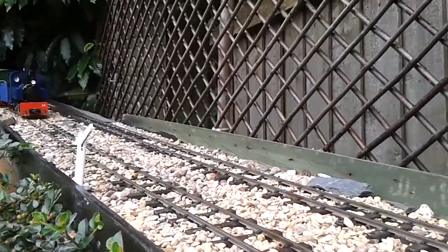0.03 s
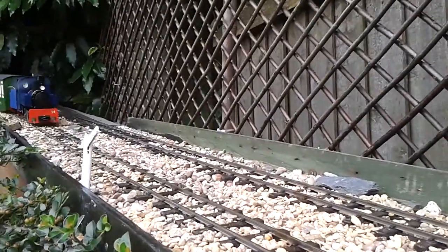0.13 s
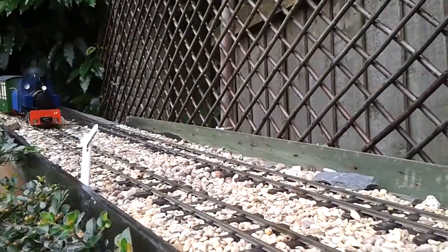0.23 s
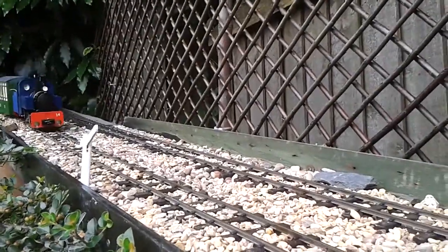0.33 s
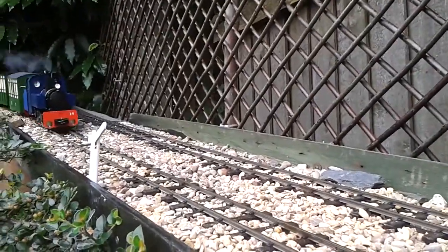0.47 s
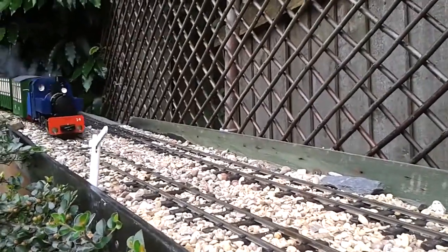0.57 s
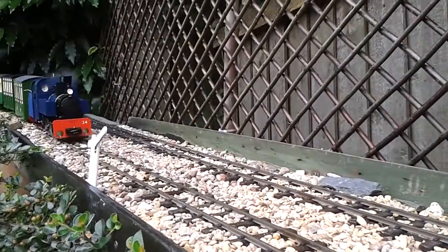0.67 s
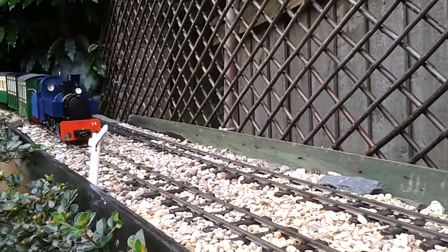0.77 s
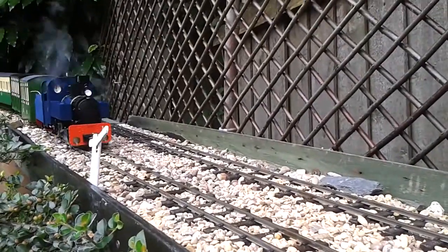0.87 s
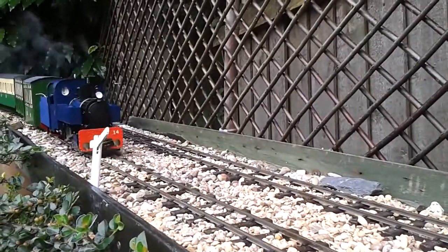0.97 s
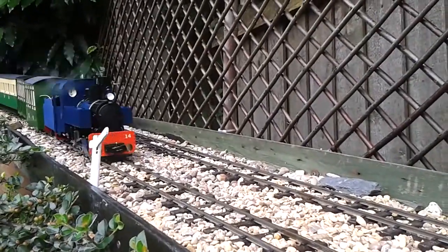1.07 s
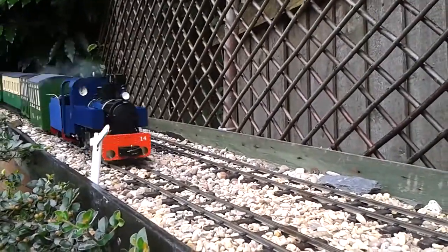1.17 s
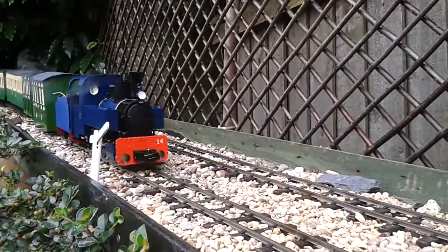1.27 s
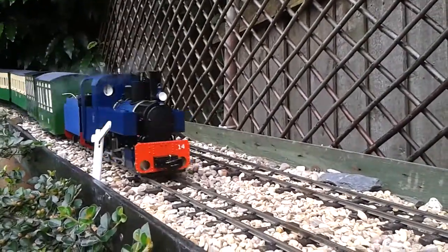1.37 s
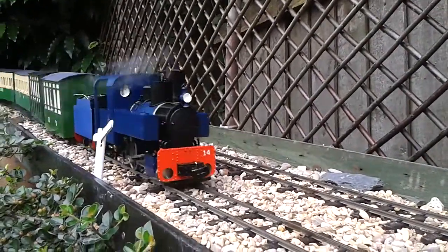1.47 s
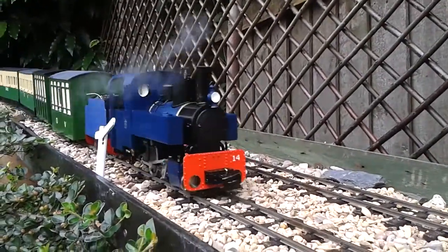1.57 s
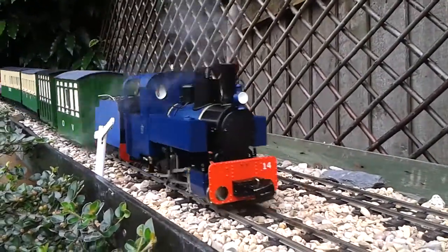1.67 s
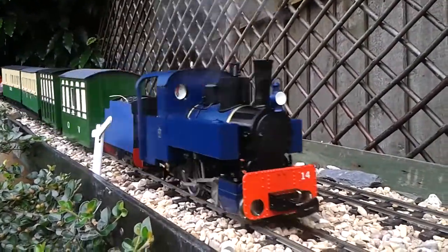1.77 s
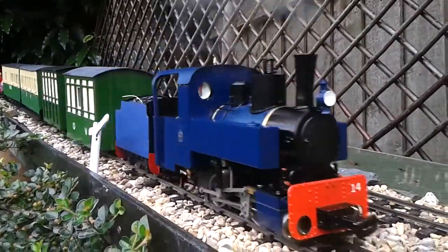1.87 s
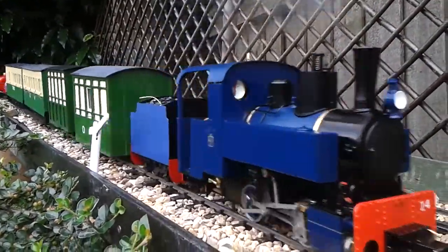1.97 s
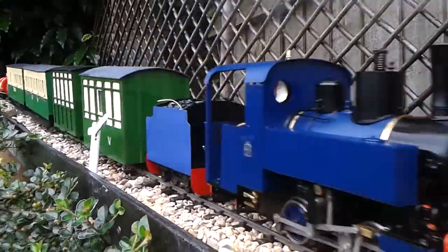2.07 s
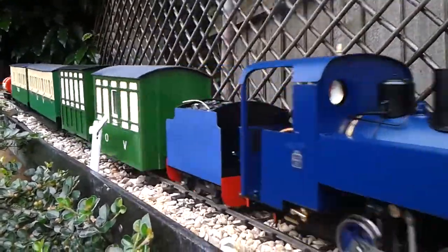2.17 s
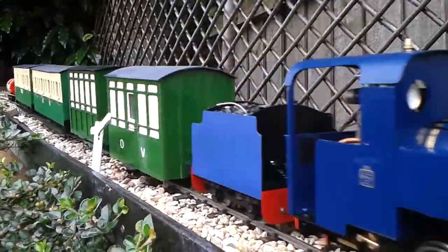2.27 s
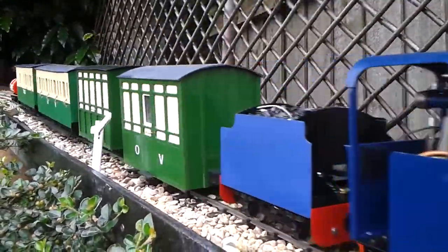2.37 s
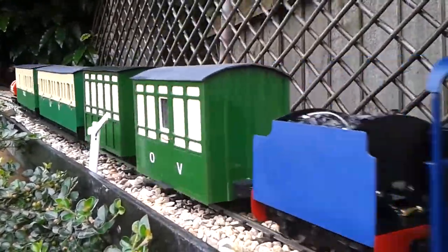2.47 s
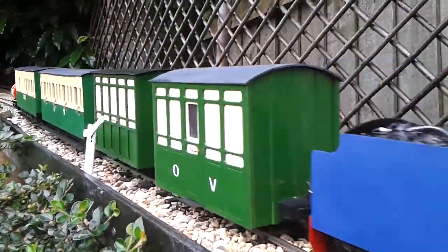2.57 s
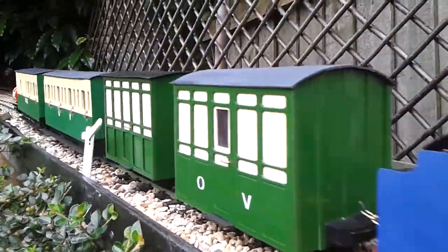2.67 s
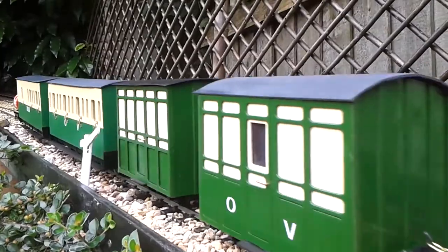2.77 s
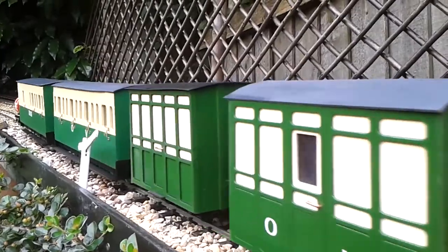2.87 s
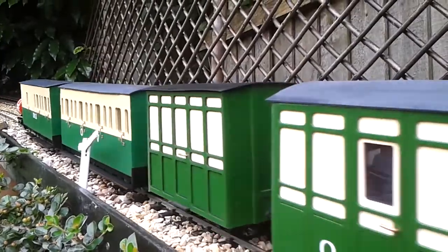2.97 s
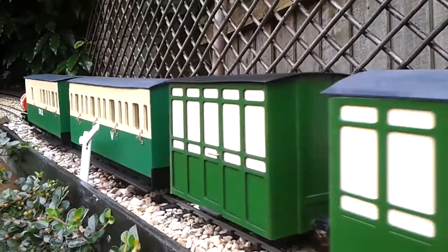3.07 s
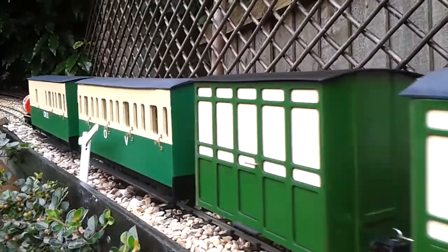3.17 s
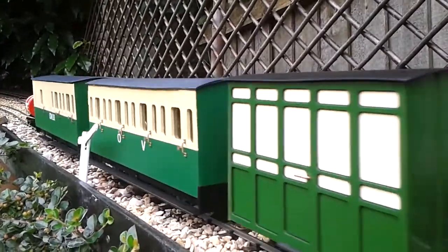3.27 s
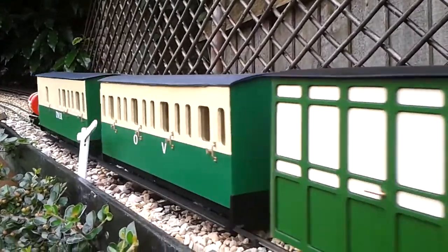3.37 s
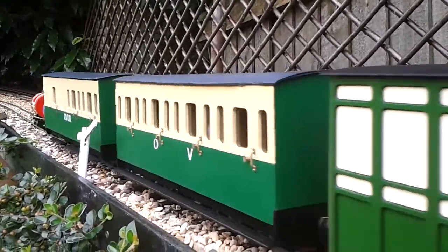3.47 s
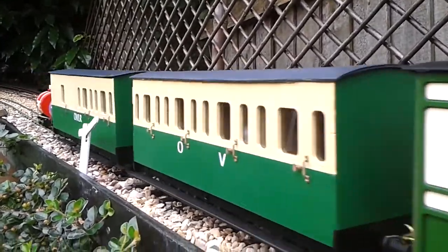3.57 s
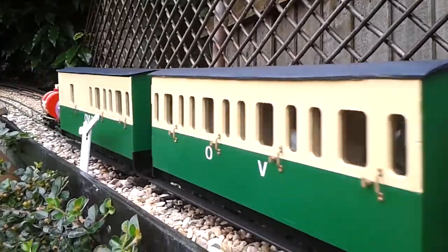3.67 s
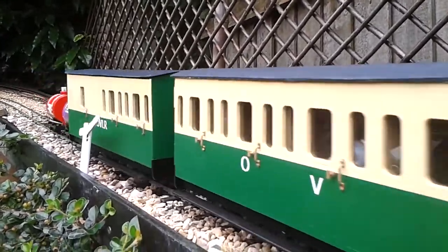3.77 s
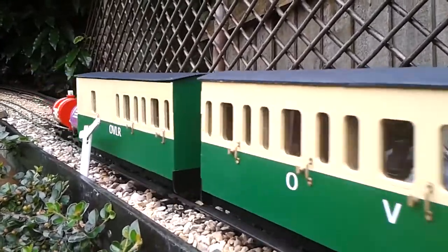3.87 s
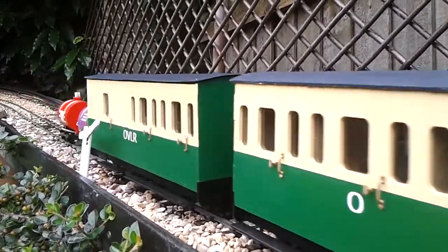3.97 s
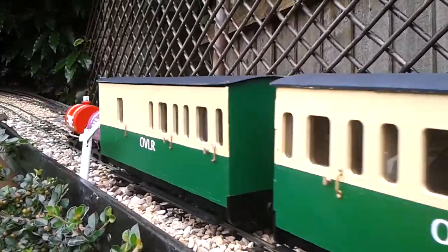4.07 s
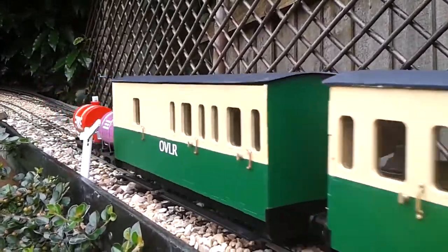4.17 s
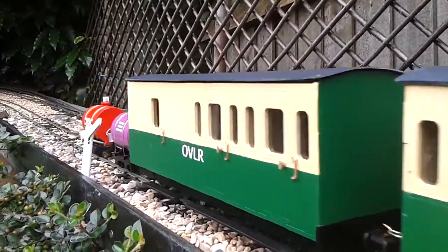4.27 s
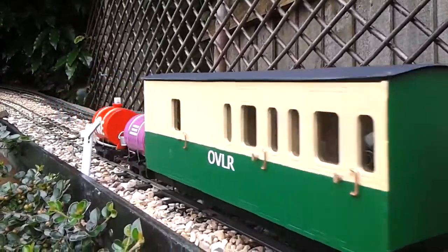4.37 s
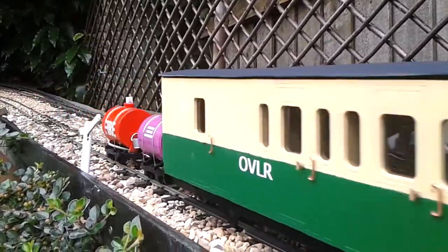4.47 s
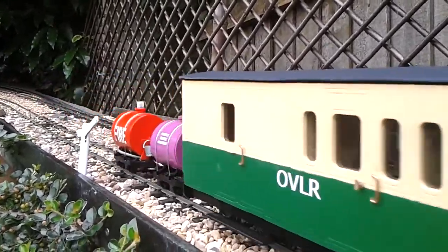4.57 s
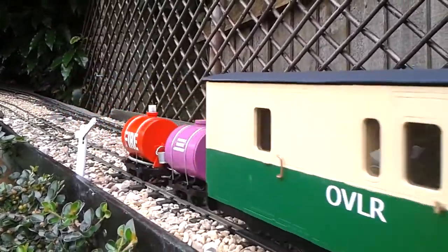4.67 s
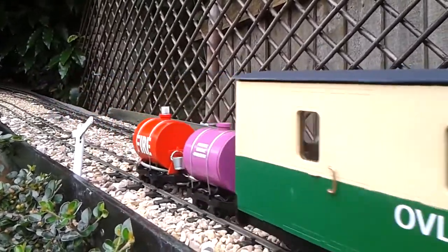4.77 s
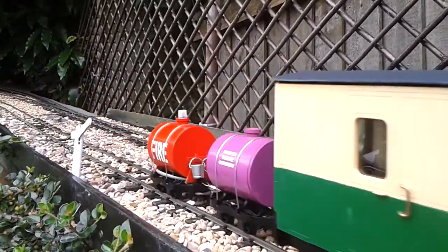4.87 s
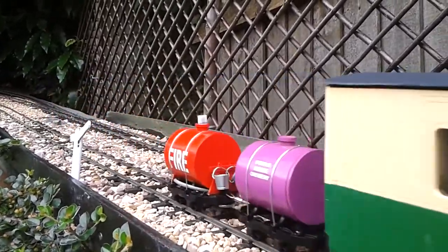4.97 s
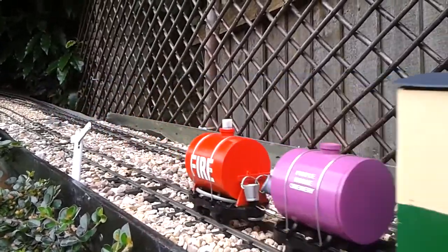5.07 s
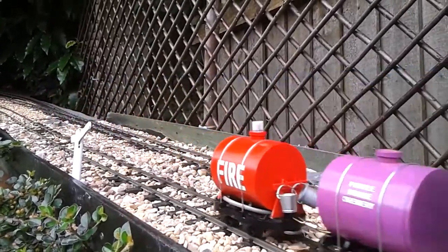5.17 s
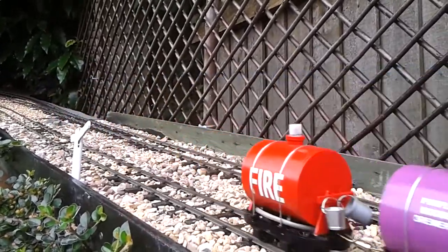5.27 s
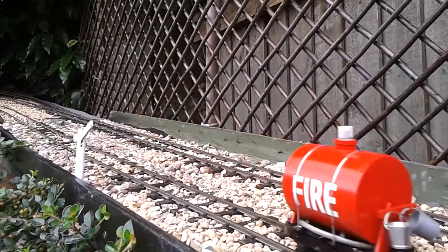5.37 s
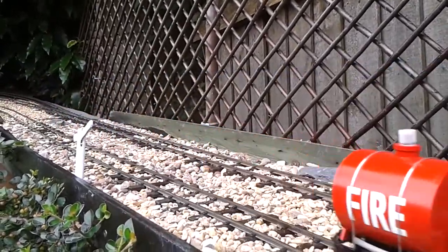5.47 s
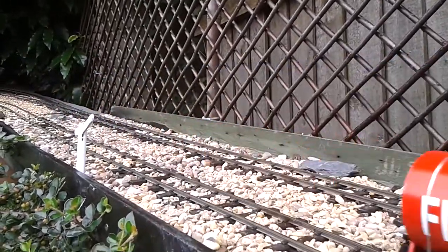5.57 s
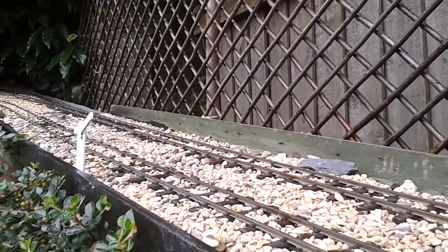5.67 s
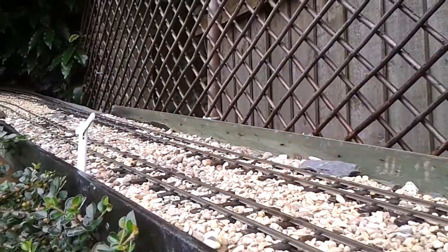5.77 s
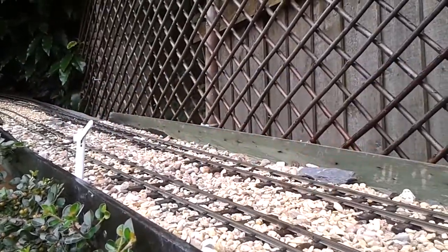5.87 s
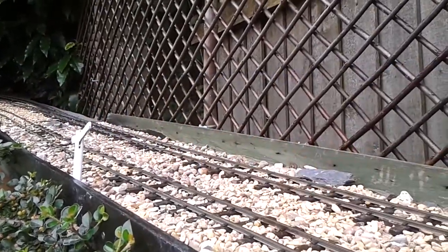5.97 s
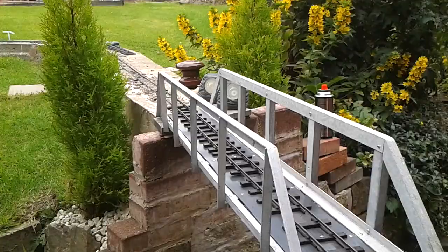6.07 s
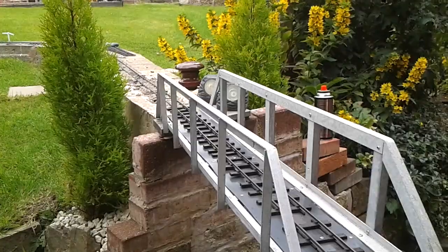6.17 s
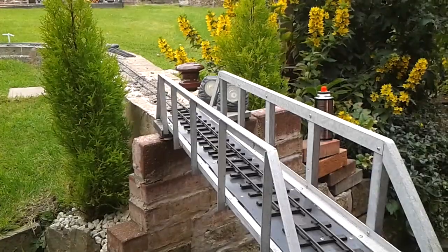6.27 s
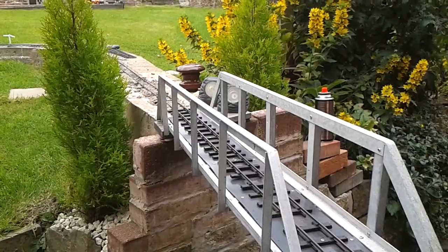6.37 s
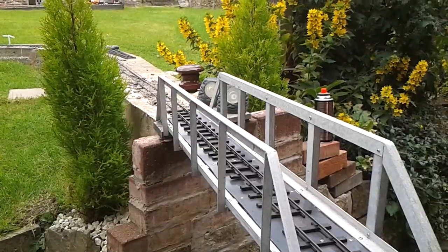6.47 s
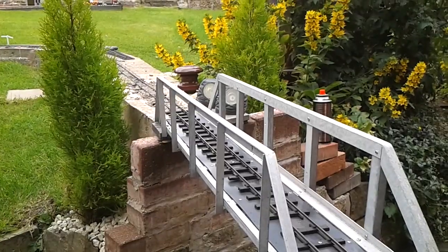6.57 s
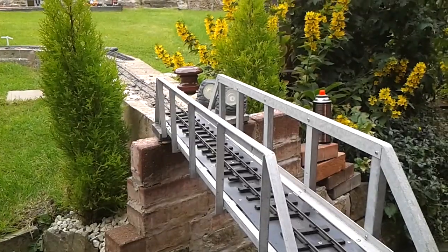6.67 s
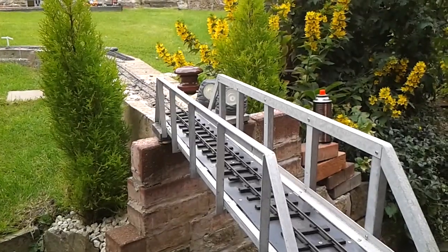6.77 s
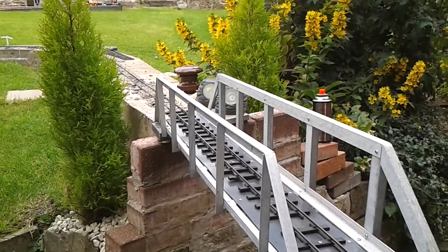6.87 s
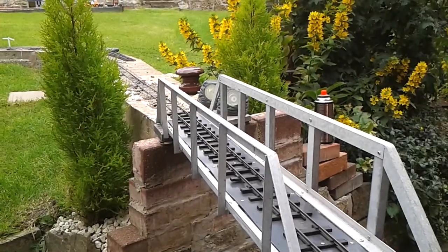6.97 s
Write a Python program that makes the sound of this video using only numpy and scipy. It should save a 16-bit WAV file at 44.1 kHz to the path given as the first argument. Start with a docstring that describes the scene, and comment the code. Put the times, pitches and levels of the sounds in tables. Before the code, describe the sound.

Outdoors in a garden, a miniature steam engine passes close to the microphone, its very fast wet chuffs slowing slightly over a fluttering hiss. Hollow coaches rumble and rail joints knock behind it, with a tiny sharp wheel squeal midway. Light wind buffets the microphone. After about six seconds the sound stops abruptly; following a short silence, steady distant chuffs fade in with two small metallic clinks.

```python
"""A small live-steam locomotive runs past close by in a garden, its chuffs slowing from about 27 to 19 a second.
Shaped noise makes the chuffs and hiss, and a fence behind the track returns a moving echo of them.
Hollow coaches rumble, rail joints knock, a wheel flange squeals halfway through; wind nudges the microphone.
After a short silence the train fades in again, approaching a bridge from afar, with steady chuffs and two clinks."""
import sys
import numpy as np
from scipy import signal
from scipy.fft import rfft, irfft, next_fast_len
from scipy.io import wavfile
from scipy.ndimage import uniform_filter1d, map_coordinates

SR = 44100
rng = np.random.default_rng(int(sys.argv[2]) if len(sys.argv) > 2 else 0)


def generate_wav(signal):
    """Clip the signal to [-1, 1] and save it as 16-bit WAV at the path in sys.argv[1]."""
    frames = np.transpose(np.atleast_2d(signal))
    scaled = np.clip(frames, -1, 1) * 32767
    pcm = np.round(scaled).astype(np.int16)
    wavfile.write(sys.argv[1], SR, pcm)


N = 309229

TIME = np.arange(N) / SR  # s
NEAR_END, FAR_START = 6.051, 6.39  # s, with silence between them
TOP_HZ = 12200  # nothing is kept above this
TRACK_M = .345  # from the microphone to the track

# tone of wheels on rough rails: (frequency [Hz], relative level per Hz [dB])
TRACK_TONE = [(60, -9.5), (110, -3), (190, -0.5), (290, 2), (420, 1.5), (600, -1), (740, -0.5), (950, -2),
              (1170, 1), (1500, -4.5), (2200, -5.5), (4000, -23.5)]


def amp(db):
    """Decibels to gain."""
    return 10 ** (np.asarray(db) / 20)


def unit(x):
    """Scale to rms 1."""
    return x / np.sqrt(np.mean(x ** 2) + 1e-20)


def curves(rows):
    """One value per sample for each column after the time."""
    s, *columns = np.transpose(rows)
    return [np.interp(TIME, s, column) for column in columns]


def wobble(rate):
    """A smooth random curve with the given number of knots a second."""
    knots = rng.standard_normal(int(N * rate / SR) + 4)
    return map_coordinates(knots, [TIME * rate])


def filtered(x, response):
    """Multiply the spectrum of x by a response that depends on frequency."""
    size = next_fast_len(N + SR // 2)
    spectrum = rfft(x, size) * response(np.fft.rfftfreq(size, 1 / SR))
    return irfft(spectrum, size)[:N]


def coloured(x, points):
    """Shape x by (Hz, dB) points, falling steeply outside them, at rms 1."""
    f, db = np.transpose(points)

    def response(hz):
        low_skirt = 1 / (1 + (f[0] / 2 / (hz + 1)) ** 4)
        high_skirt = 1 / (1 + (hz / f[-1] / 2) ** 4)
        return low_skirt * high_skirt * amp(np.interp(np.log(hz + 1), np.log(f), db))

    return unit(filtered(x, response))


def resonate(x, modes):
    """Pass x through (Hz, width Hz, dB) resonances with alternating signs, at rms 1."""
    def response(f):
        total = 0
        for k, (centre, width, db) in enumerate(modes):
            resonance = 1j * f * width / (centre * centre - f * f + 1j * f * width)
            total = total + (-1) ** k * amp(db) * resonance
        return total

    return unit(filtered(x, response))


def noise():
    """White noise: a hiss with all frequencies equally strong."""
    return rng.standard_normal(N)


def ringing(modes):
    """Noise passed twice through a resonance, so its sides are steep."""
    return resonate(resonate(noise(), modes), modes)


def bumps(rate, spread_db):
    """Random little impacts of uneven size, at rms 1."""
    hits = rng.random(N) < rate / SR
    return unit(hits * noise() * amp(spread_db * noise()))


def eddies(patchy_db):
    """Turbulent noise whose colour shifts from moment to moment."""
    spectrum = signal.stft(noise(), nperseg=512)[2]
    field = rng.standard_normal(spectrum.shape)
    field = uniform_filter1d(field, size=3, axis=0)  # blurred over frequency
    field = uniform_filter1d(field, size=12, axis=1)  # blurred over time
    return signal.istft(spectrum * amp(patchy_db * unit(field)), nperseg=512)[1][:N]


def add(track, s, sound):
    """Mix a sound into the track at time s."""
    part = track[max(round(s * SR), 0):][:len(sound)]
    part += sound[:len(part)]


def nearness(s, passing):
    """Gain that peaks at time s and falls to half within the passing time (s) on either side."""
    return 1 / (1 + ((TIME - s) / passing) ** 2)


def wheel_turns(first_beat_s=.012):
    """Turns of the driving wheels since the first beat: their speed added up over time."""
    # speed of the driving wheels: (time [s], speed [turns per s])
    wheel_speed = [(0, 6.895), (.3, 6.91), (.5, 6.644), (.8, 6.732), (1.4, 6.344), (1.5, 6.377), (2.2, 5.3),
                   (2.7, 5.22), (3.1, 4.904), (3.2, 5.245), (3.9, 5.061), (4.5, 4.736), (5.1, 4.642),
                   (6.05, 4.852)]
    turns = np.cumsum(curves(wheel_speed)[0]) / SR
    return turns - np.interp(first_beat_s, TIME, turns)


def position(turn_m=.12, pass_turns=15.66):
    """Metres along the track: negative while the engine is coming, zero with the chimney alongside."""
    return turn_m * (wheel_turns() - pass_turns)


def beamed(sides_db, beam_m=1.33):
    """Gain of a tone as the engine turns its front, flank and back to the microphone."""
    return amp(np.interp(position(), [-beam_m, 0, beam_m], sides_db))


def beats(turns, level_db, start, end, scatter_db=.7, open_scatter=.08):
    """Four exhaust beats to each turn of the wheels: rows (s, dB, open time s, after-puff dB)."""
    # the valves are set unevenly, so the four beats limp: (moment in the turn [share of a turn])
    valve_timing = [0, .21, .462, .744]
    # the same beats: (relative level [dB], average time the port stays open [s], returning puff [dB])
    port_settings = [(1, .0155, -17.5), (.4, 0.017, -11), (-0.34, .021, -12.5), (0.22, 0.015, -18)]
    rows = []
    for turn in range(int(np.floor(turns[round(start * SR)])), int(turns[-1]) + 1):
        for share, (db, length, puff_db) in zip(valve_timing, port_settings):
            s = np.interp(turn + share, turns, TIME)
            louder, longer = rng.standard_normal(2)
            if start < s < end:
                db = db + np.interp(s, TIME, level_db) + scatter_db * louder
                rows.append((s, db, length * np.exp(open_scatter * longer), puff_db))
    return np.array(rows)


def blasts(strokes, rise=.003, after_delay=0.028, after_width=0.0065, tail_share=0.16):
    """Steam flow: each port opens fast and empties its cylinder; the returning piston adds a softer puff."""
    power, t = np.zeros(N), np.arange(SR // 8) / SR
    for s, db, length, after_db in strokes:
        opening = 1 - np.exp(-(t / rise) ** 2)
        closing = np.exp(-(t / length) ** 3)
        afterflow = np.exp(-t / .05)
        release = opening * ((1 - tail_share) * closing + tail_share * afterflow)
        puff_gain = amp(after_db + rng.standard_normal())
        puff = puff_gain * np.exp(-((t - after_delay) / after_width) ** 2)
        add(power, s, amp(db) ** 2 * (release ** 2 + puff ** 2))
    return np.sqrt(power)


def wind(level_db=1.5, lump_db=2.0, spread=.42, breeze_db=-64):
    """Lumpy puffs of air swell and die on the microphone over a faint breeze of low noise."""
    # puffs: (start [s], length [s], level before the trim level_db [dB])
    gust_puffs = [(0.037, 0.067, -39.5), (0.112, 0.055, -41.5), (0.354, 0.052, -40), (0.428, .055, -38.5),
                  (0.497, 0.055, -37), (0.635, .036, -38), (0.682, 0.057, -38.5), (.762, 0.052, -41.5),
                  (1.175, 0.037, -39.5), (1.217, .04, -40), (1.334, .17, -29.5), (1.622, .052, -40),
                  (1.72, .034, -37.5), (6.627, .06, -45), (6.753, 0.079, -43.5)]
    # tone of wind on the microphone: (frequency [Hz], relative level per Hz [dB])
    buffet_tone = [(22, -32.5), (38, -16), (58, -2.5), (95, -0.5), (140, -6), (220, -18), (450, -49.5)]
    power = amp(breeze_db) ** 2
    for s, length, db in gust_puffs:
        power = power + (amp(db + level_db) * nearness(s + length / 2, spread * length)) ** 2
    lumps = unit(amp(lump_db * wobble(30)) * coloured(noise(), buffet_tone))
    return np.sqrt(power) * lumps


def far_train(chuff_db=2, steam_db=-3, clink_t60=0.011):
    """From afar steady beats stand less clear of the hiss; couplings clink; all but the clinks fades in."""
    # tone of the distant chuffs and clinks: (frequency [Hz], relative level per Hz [dB])
    far_chuff_tone = [(1800, -30), (2400, -11), (3700, -1.5), (4300, -6.5), (4900, -13.5), (5600, -13),
                      (6100, -3), (6650, 3.5), (7300, -20), (7900, -40), (8800, -23.5), (12000, -46.5)]
    # tone of the distant steam: (frequency [Hz], relative level per Hz [dB])
    far_steam_tone = [(1000, -29), (1900, -22), (2500, -4.5), (3700, -7), (4300, -8), (4900, -6),
                      (5600, -5), (6100, -3.5), (6600, 1.5), (7300, -8.5), (7900, -33), (8800, -25),
                      (10800, -27), (12000, -52.5)]
    # tone of the distant rumble: (frequency [Hz], relative level per Hz [dB])
    far_rumble_tone = [(80, -2), (150, -8), (300, -1), (550, -6), (760, -0.5), (1050, -13.5), (2000, -21)]
    # clinking couplings: (time [s], level [dB])
    coupling_clinks = [(6.539, -43), (6.866, -33)]
    turns_per_s, first_beat_s = 5.71, 6.453
    beat_db, hiss_db, rumble_db = -34, -38.5, -50  # beats and hiss are trimmed below
    fade_db, fade_s = 28, 0.11  # depth and time constant

    strokes = beats(turns_per_s * (TIME - first_beat_s), np.full(N, beat_db), FAR_START, TIME[-1])
    clinks, t = np.zeros(N), np.arange(SR // 20) / SR
    for s, db in coupling_clinks:
        add(clinks, s, amp(db - 60 * t / clink_t60))  # 60 dB down after clink_t60 seconds
    fade = amp(-fade_db * np.exp(-np.maximum(TIME - FAR_START, 0) / fade_s))
    flow = amp(chuff_db) * fade * blasts(strokes) + clinks
    chuffs = flow * coloured(eddies(patchy_db=2.5), far_chuff_tone)
    hiss = amp(hiss_db + steam_db) * coloured(noise(), far_steam_tone)
    rumble = amp(rumble_db) * coloured(noise(), far_rumble_tone)
    return chuffs + fade * (hiss + rumble)


def boom(steady_db=-58, peak_db=-50, peak_s=5.0, passing_s=0.18):
    """The boards under the track answer the weight with one low mode, swelling as the last coach goes by."""
    # low mode of the boards: (frequency [Hz], width [Hz], relative level [dB])
    board_mode = [(93, 63, 0)]
    level = amp(steady_db) + amp(peak_db) * nearness(peak_s, passing_s)
    return level * ringing(board_mode)


def wheels(track_db=3.0, body_db=0, sway_db=1, surge_db=1.33, sharpness=4.8):
    """Rough rails shake the track bed; each vehicle's hollow body drums louder as it goes by."""
    # wheels on the rails: (time [s], level before the trim track_db [dB])
    rolling_levels = [(0, -45.5), (1.6, -44), (3.15, -44), (3.7, -41.5), (4.2, -43), (6, -45.5)]
    # drumming bodies: (time nearest [s], passing time [s], low mode [Hz], level before the surges [dB],
    # high mode [Hz], level before the surges [dB])
    drumming_bodies = [(1.5, 0.75, 268, -50, 693, -44), (2.1, .3, 186, -46, 765, -46),
                       (2.749, 0.45, 183, -46.5, 830, -44.5), (3.55, 0.33, 279, -45.5, 505, -43),
                       (3.851, 0.22, 498, -40.5, 708, -38), (4.29, 0.21, 500, -40, 717, -40.5),
                       (4.72, 0.34, 577, -39.5, 803, -41), (5.17, 0.17, 602, -46.5, 694, -40),
                       (5.7, 0.85, 302, -48, 712, -44)]
    rolling = amp(curves(rolling_levels)[0] + track_db)
    out = rolling * coloured(bumps(rate=2500, spread_db=0.5), TRACK_TONE)
    for s, passing, low_hz, low_db, high_hz, high_db in drumming_bodies:
        for hz, db in (low_hz, low_db), (high_hz, high_db):
            level = amp(db + body_db + surge_db * wobble(14)) * nearness(s, passing)
            out += level * ringing([(hz, hz / sharpness + 25, 0)])
    return amp(sway_db * wobble(25)) * out


def joints(knock_db=-4):
    """A wheel drops into a rail gap: a dull crack and a short ring."""
    # knocks: (time [s], level before the trim knock_db [dB], ring pitch [Hz])
    joint_knocks = [(0.195, -25.5, 1110), (0.411, -21.5, 1185), (0.519, -21.5, 1130), (0.552, -21, 506),
                    (1.159, -25.5, 1130), (1.5, -21.5, 680), (1.994, -21, 650), (2.133, -21, 590),
                    (3.603, -19.5, 523), (3.783, -23.5, 590), (4.153, -29.5, 694), (4.33, -14, 460),
                    (4.511, -22, 646), (5.085, -31, 685), (5.112, -18.5, 703), (5.807, -22, 714)]
    out, t = np.zeros(N), np.arange(SR // 10) / SR
    for s, db, hz in joint_knocks:
        ring = amp(-60 * t / .035) * np.sin(2 * np.pi * hz * t)
        crack = amp(-60 * t / .03) * coloured(noise(), TRACK_TONE)[:len(t)] / 2
        soft_start = 1 - np.exp(-t * hz)
        add(out, s, amp(db + knock_db) * soft_start * (ring + crack))
    return out


def flange(rub_db=-34):
    """The wheel sticks and slips on the rail in three unsteady chirps, singing faintly between them."""
    # pitch of the flange rubbing the rail: (time [s], pitch [Hz])
    squeal_pitch = [(3.42, 4920), (3.433, 5000), (3.438, 4400), (3.463, 4430), (3.484, 4800), (3.489, 4400),
                    (3.497, 4330)]
    # bites: (time loudest [s], half length [s], level [dB], octave relative to it [dB])
    chirp_bites = [(3.43, .011, -11, -20), (3.456, 0.0076, -13.5, -9), (3.492, .004, -12.5, -21)]
    hz, = curves(squeal_pitch)
    shaky_hz = hz * (1 + .007 * wobble(900))
    phase = 2 * np.pi * np.cumsum(shaky_hz) / SR
    rubbing = (TIME > chirp_bites[0][0]) & (TIME < chirp_bites[-1][0])
    out = amp(rub_db) * np.sin(phase) * rubbing
    for s, half, db, octave_db in chirp_bites:
        bite = np.exp(-((TIME - s) / half) ** 4)
        out += amp(db) * bite * (np.sin(phase) + amp(octave_db) * np.sin(2 * phase))
    return out


def passing_beats():
    """The beats of the close pass follow the engine's effort and fall off with distance."""
    # force of the exhaust, rising as the train drags: (time [s], level alongside before other trims [dB])
    exhaust_effort = [(0, -15), (.5, -11), (1.2, -10.5), (1.9, -11.5), (2.7, -12.5), (3.15, -10.5),
                      (3.45, -12), (3.8, -9), (4.15, -9.5), (4.55, -6), (5.6, -7), (6.05, -6.5)]
    # beats that spit harder than their neighbours: (time [s], extra level [dB])
    hard_spits = [(.303, 1.5), (1.119, 2), (3.169, 2), (3.79, 1.5), (5.088, 3.5), (5.204, 4)]
    spreading_db = 20 * np.log10(TRACK_M / np.hypot(position(), TRACK_M))
    rows = beats(wheel_turns(), curves(exhaust_effort)[0] + spreading_db, 0, NEAR_END)
    for s, db in hard_spits:
        nearest = np.argmin(abs(rows[:, 0] - s))
        rows[nearest, 1] += db
    return rows


def valve_lap(strokes, dip_db=-3.5, lead=0.0064, width=0.0049):
    """Just before each beat the valve covers the ports and the steam drops back."""
    shut, t = np.zeros(N), np.arange(-SR // 50, SR // 50) / SR
    for s in strokes[:, 0]:
        add(shut, s - lead + t[0], np.exp(-(t / width) ** 2))
    return amp(dip_db * shut)


def echoes(x, fence=.55, fence_hz=7500, bounce=0.1, bounce_ratio=0.165):
    """Fence and ballast echoes lag most near the closest point, sweeping comb-like notches through the steam."""
    mirror_along_m, mirror_across_m = .105, 1.139  # the microphone mirrored by the fence, from the track
    along = position()
    fence_path = np.hypot(along - mirror_along_m, mirror_across_m)
    lag = (fence_path - np.hypot(along, TRACK_M)) / 343  # speed of sound, m/s
    dull = filtered(x, lambda hz: 1 / (1 + (hz / fence_hz) ** 4))  # rough surfaces scatter the treble

    def late(delay):
        return map_coordinates(dull, [(TIME - delay) * SR], order=3)

    mixed = x + fence * late(lag) + bounce * late(bounce_ratio * lag)
    return mixed / np.sqrt(1 + fence ** 2 / 2)


def locomotive(chuff_db=-3, sizzle_db=-13, hiss_db=-3, ring_db=-2.5, spit_db=1.04, flutter_db=2.6):
    """Wet, spitting exhaust beats over a fluttering hiss of escaping steam and its hollow ring."""
    # blast at the chimney: (frequency [Hz], relative level per Hz [dB])
    chuff_tone = [(880, -53), (1500, -13), (1900, -9.5), (2280, 3.5), (3200, 5), (4000, 5), (4700, 0),
                  (5300, 1.5), (6300, 7.5), (6950, 2), (8000, -16), (8850, -5), (9800, -17.5), (10800, -12),
                  (12200, -45)]
    # ring of the chimney: (frequency [Hz], width [Hz], relative level [dB])
    chimney_mode = [(3957, 940, 0)]
    # sizzling treble: (frequency [Hz], relative level per Hz [dB])
    sizzle_tone = [(6000, -43.5), (8000, -13.5), (9800, 4), (11200, 2.5), (12200, -18)]
    # steady escape of steam: (time [s], level before the trim hiss_db [dB])
    steam_levels = [(0, -28.5), (.86, -31), (1.4, -32), (2.3, -31), (3.4, -32.5), (6, -33.5)]
    # tone of the steam: (frequency [Hz], relative level per Hz [dB])
    hiss_tone = [(900, -22), (1700, -19.5), (2300, -8.5), (2750, -2), (3400, -6), (4500, -0.5), (5500, 2),
                 (6700, 0.5), (7900, -14), (8800, -13), (10800, -20), (12300, -77.5)]
    # the hiss rings in the boiler fittings: (frequency [Hz], width [Hz], relative level [dB])
    fittings_mode = [(5196, 810, 0)]
    # and lower, in the cab: (frequency [Hz], width [Hz], relative level [dB])
    cab_mode = [(2684, 620, 0)]
    # each tone is beamed its own way: (coming [dB], alongside [dB], going away [dB]), before the trims
    chimney_beam, sizzle_beam = (-9.5, -7, -4.5), (-15.5, -7, -26)
    fittings_beam, cab_beam = (-29.5, -25, -49.5), (-43, -29.5, -45)

    strokes = passing_beats()
    blast = coloured(eddies(patchy_db=3), chuff_tone)
    pipe = beamed(chimney_beam) * ringing(chimney_mode)
    sizzle = amp(sizzle_db) * beamed(sizzle_beam) * coloured(noise(), sizzle_tone)
    spitting = amp(chuff_db + spit_db * wobble(700))
    chuffs = spitting * blasts(strokes) * (blast + pipe + sizzle)

    flutter = amp(flutter_db * wobble(90))
    steam = coloured(eddies(patchy_db=2.5), hiss_tone) + sizzle
    hiss = amp(curves(steam_levels)[0] + hiss_db) * steam
    ring = beamed(fittings_beam) * ringing(fittings_mode) + beamed(cab_beam) * ringing(cab_mode)
    return valve_lap(strokes) * (echoes(chuffs + flutter * hiss) + amp(ring_db) * flutter * ring)


def scene():
    """The close pass, an abrupt silence, then the far approach."""
    near, far = TIME < NEAR_END, TIME > FAR_START
    passing = locomotive() + wheels() + boom() + joints() + flange()
    return (near * passing + far * far_train() + (near | far) * wind())[None]


def record(dry):
    """Remove everything above the band limit."""
    return np.array([filtered(channel, lambda hz: hz < TOP_HZ) for channel in dry])


dry = scene()
out = record(dry)
generate_wav(out)
```